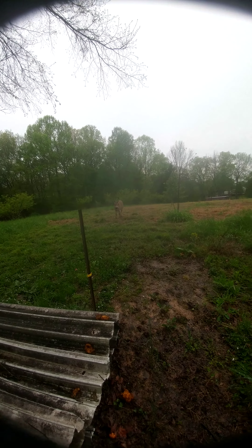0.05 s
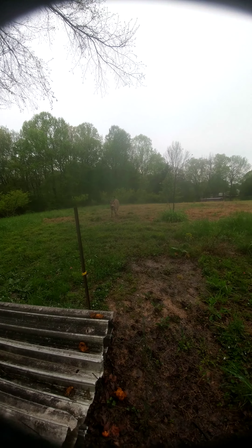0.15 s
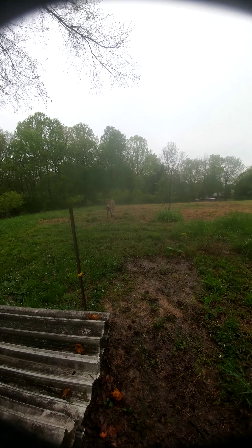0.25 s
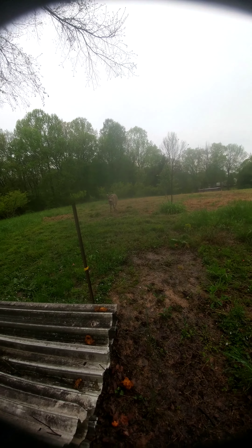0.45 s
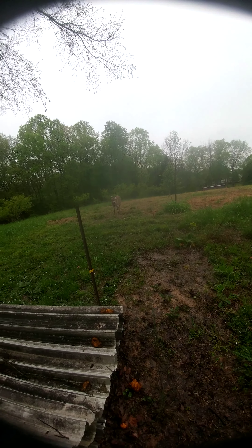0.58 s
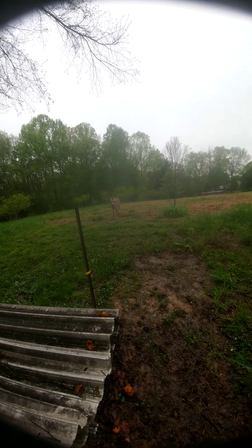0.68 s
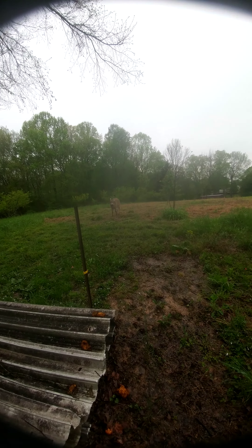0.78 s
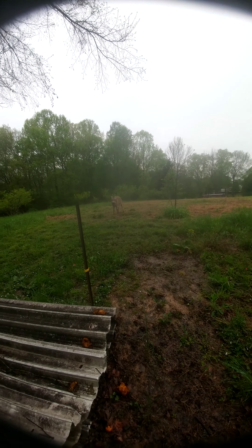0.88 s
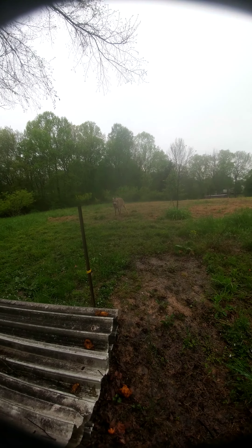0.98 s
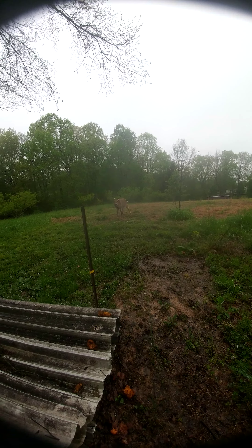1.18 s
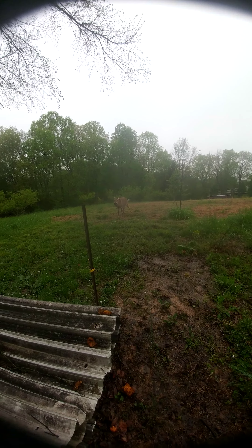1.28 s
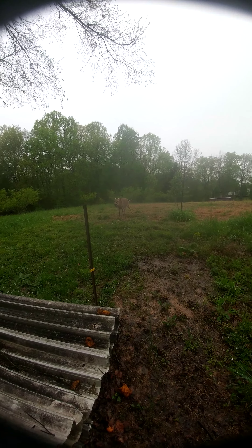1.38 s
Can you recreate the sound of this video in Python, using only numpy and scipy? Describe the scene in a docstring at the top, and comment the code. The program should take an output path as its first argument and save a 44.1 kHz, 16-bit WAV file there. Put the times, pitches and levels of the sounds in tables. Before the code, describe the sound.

A donkey brays hoarsely, two rattling grunts alternating with wheezy, whistling in-breaths in a quiet field.

```python
"""A dry click and the end of a wheezy in-breath come first, then a donkey brays hoarsely beside a field.
Two rattling grunts go out, each a train of throat pulses ringing the airway, with rushing air around them.
The wheezes between and after are noise drawn through wavering resonances; thin gliding tones break from them.
Clicks and scuffs, short noise bursts, sound close to the two microphones.
A faint scatter and quiet open air, both made of shaped noise, lie behind."""
import sys
import numpy as np
from scipy import signal
from scipy.fft import rfft, irfft
from scipy.io import wavfile

SR = 44100
rng = np.random.default_rng(int(sys.argv[2]) if len(sys.argv) > 2 else 0)


def to_wav(s):
    """Save 16-bit WAV."""
    ch = np.atleast_2d(s).T  # columns
    pcm = np.round(np.clip(ch, -1, 1) * 32767)  # PCM
    wavfile.write(sys.argv[1], SR, pcm.astype(np.int16))


N = 63945
T = np.arange(N) / SR


def amp(db):
    """Decibels to gain."""
    return 10 ** (np.asarray(db) / 20)


def unit(x):
    """Scales to rms 1."""
    return x / np.sqrt(np.mean(x ** 2) + 1e-20)


def read(points, hz, axis=1):
    """Reads a column of a table along log frequency."""
    p = np.array(points, float)
    return np.interp(np.log(hz + 1), np.log(p[:, 0] + 1), p[:, axis])


def level(points, axis=1):
    """Gain from a dB curve over time, silent outside it."""
    p = np.array(points, float)
    return amp(np.interp(T, p[:, 0], p[:, axis], left=-np.inf, right=-np.inf))


def colour(x, points, size=4096):
    """Causal (minimum-phase) filter of energy 1 with the given spectrum."""
    log_gain = np.log(amp(read(points, abs(np.fft.fftfreq(size, 1 / SR)))))
    ring = np.fft.ifft(np.exp(np.conj(signal.hilbert(log_gain)))).real[:size // 2]
    ring = ring / np.linalg.norm(ring)
    return signal.fftconvolve(np.atleast_2d(x), ring[None], axes=1)[:, :N]


def drift(rate_hz):
    """Random wandering of rms 1, smooth above the given rate."""
    softening = 1 + (np.fft.rfftfreq(N, 1 / SR) / rate_hz) ** 4
    return unit(irfft(rfft(rng.standard_normal(N)) / softening, N))


def resonate(x, hz, width_hz):
    """A resonance of gain 1 that follows a pitch curve: shift to zero frequency, smooth, shift back."""
    turn = np.exp(2j * np.pi * np.cumsum(hz * np.ones(N)) / SR)
    r = np.exp(-np.pi * width_hz / SR)
    return 2 * (turn * signal.lfilter([1 - r], [1, -r], x / turn)).real


def burst(start, rise_s, decay_s):
    """Quick rise, exponential fall."""
    t = np.maximum(T - start, 0)
    return np.minimum(t / rise_s, 1) * np.exp(-t / decay_s)


def throat_pulses(turns, strong_s):
    """Uneven throat pulses, every third the strongest, and the beat position counted from a strong one."""
    # Strength of each pulse in the cycle of three, in dB before shimmer.
    beat_db = [0, -2, -4.5]
    jitter_s, shimmer_db = .00022, 1.5  # rms unevenness of timing and strength
    turns = turns - np.interp(strong_s, T, turns)
    beats = np.arange(np.ceil(turns[0]) + 1, np.floor(turns[-1]) - 1).astype(int)
    chance = rng.standard_normal((len(beats), 2))
    at = np.interp(beats, turns, T) + jitter_s * chance[:, 0]
    strength_db = np.array(beat_db)[beats % len(beat_db)] + shimmer_db * chance[:, 1]
    pulses = np.zeros(N)
    pulses[np.clip(np.round(at * SR).astype(int), 0, N - 1)] = amp(strength_db)
    return pulses, turns


def smear(x, hz=597, width_hz=574):
    """The long airway delays a band, spreading each pulse: two equal all-pass stages."""
    r = np.exp(-np.pi * width_hz / SR)
    poles = [1, -2 * r * np.cos(2 * np.pi * hz / SR), r * r]
    poles = np.convolve(poles, poles)
    return signal.lfilter(poles[::-1], poles, x)


def grunt(effort, rate, strong_s, throat, voice_db, air_db, rough, puff, soft_db):
    """Slow throat pulses ring the airway and quivering mouth and chop the escaping air."""
    # Rushing out-breath. Each row: frequency in Hz, relative level in dB per Hz.
    air_out = [(200,-2),(1000,7),(1750,-5),(2500,3),(3450,-4),(4000,4.5),(4700,-4.5),(5900,-1.5),(6800,-10.5),(7900,-5),(9000,-20.5),(9700,-10),(11200,-12),(12600,-36)]
    pulses, turns = throat_pulses(np.cumsum(np.interp(T, *np.transpose(rate))) / SR, strong_s)
    gate = np.exp(-(turns % 1) / 0.35)  # air escapes most just after each beat
    hoarse = unit(pulses) + rough * unit((0.048 + gate) * rng.standard_normal(N))

    # Around and below soft_db of effort the voice turns dull and breathy.
    strength = level(effort)
    edge = strength ** 2 / (strength ** 2 + amp(soft_db) ** 2)
    slack = signal.lfilter(*signal.butter(1, 605, fs=SR), rng.standard_normal(N))  # low-pass, Hz
    drive = (edge * hoarse + (1 - edge) * slack) * strength

    voice = colour(smear(drive), throat) * [[1], [0]]  # no share unrelated between the microphones
    mouth_hz = 850 * (1 + .07 * drift(40))
    voice = voice + .5 * resonate(voice, mouth_hz, width_hz=130)
    voice = voice + resonate(voice, 395, width_hz=14)  # a low chest ring outlasts the pulses
    chopped = unit((1 + puff * gate) * rng.standard_normal((2, N)))
    air = colour(chopped * level(effort, axis=2), air_out)
    return amp(voice_db) * voice + amp(air_db) * air


def first_grunt():
    """The first rattling out-breath, its pulses quickening before they ease."""
    # Out-breath. Each row: time in seconds, voice in dB, rushing air in dB, both before the trims below.
    effort = [(.152,-54,-58),(.166,-44,-42),(.208,-13,-27),(.255,-14,-25),(.32,-12,-29),(.335,-18,-33),(.362,-21,-38),(.385,-28,-52),(.45,-38,-60)]
    # Pulse rate of the throat. Each row: time in seconds, rate in Hz.
    rate = [(0.203,104.1),(0.247,102.9),(0.272,115.2),(0.321,121.4),(0.439,116.4)]
    # Throat colour. Each row: frequency in Hz, relative level in dB per Hz.
    throat = [(50,-49),(140,-15.5),(220,-5.5),(330,2),(430,2),(560,-13.5),(720,-1),(840,3.5),(980,-6),(1170,-0.5),(1420,-12.5),(1650,-28),(14000,-76)]
    return grunt(effort, rate, strong_s=.2068, throat=throat,
                 voice_db=1.0, air_db=2, rough=.22, puff=1.4, soft_db=-18)


def second_grunt():
    """The second out-breath, rougher and airier, its pulses slowing and then recovering."""
    # Out-breath. Each row: time in seconds, voice in dB, rushing air in dB, both before the trims below.
    effort = [(.726,-53,-54),(.746,-41,-35),(.779,-17.5,-28.5),(.8,-21,-28.5),(.819,-16.5,-26.5),(.83,-27,-33),(.851,-21,-30),(.865,-30,-36),(.9,-29.5,-39),(.915,-35,-48),(.96,-41,-55)]
    # Pulse rate of the throat. Each row: time in seconds, rate in Hz.
    rate = [(0.758,105.4),(0.798,103.3),(0.832,90.2),(0.902,106.6)]
    # Throat colour. Each row: frequency in Hz, relative level in dB per Hz.
    throat = [(50,-23),(170,-1.5),(280,1),(430,-3),(540,-15),(720,-3),(920,-2),(1110,-8),(1400,-12.5),(1700,-24),(14000,-61)]
    return grunt(effort, rate, strong_s=.778, throat=throat,
                 voice_db=-1.0, air_db=6.0, rough=.3, puff=1.0, soft_db=-27.5)


def wheezes(flutter_db=2.2, flutter_hz=90, pipe_width_hz=150, pipe_waver=.004):
    """Air drawn in through a narrow, fluttering airway whose resonances waver."""
    # In-breaths, one list each. Each row: time in seconds, level in dB before flutter and resonances.
    breaths = [
        [(0,-36.5),(.1,-43),(.15,-56.5)],
        [(.45,-38.5),(.468,-32),(.495,-25),(.535,-31.5),(.675,-33),(.72,-56)],
        [(.94,-47.5),(.985,-35.5),(1.015,-28),(1.09,-33.5),(1.19,-45.5),(1.34,-61.5)],
    ]
    # Rushing in-breath. Each row: frequency in Hz, relative level in dB per Hz.
    air_in = [(120,-20.5),(800,-0.5),(1400,-8),(3400,-6),(4100,0.5),(4750,2),(5120,-15),(5600,-3),(6500,-19),(8200,-15.5),(9000,-51),(9800,-14.5),(12700,-35.5)]
    # Narrow resonances of the airway. Each row: centre in Hz before waver, gain in dB.
    pipes = [(1070,8),(2390,7),(3620,3),(4010,11),(4670,15)]
    flutter = amp(flutter_db * drift(flutter_hz))
    air = sum(level(breath) for breath in breaths) * flutter * rng.standard_normal((2, N))
    out = colour(air, air_in)
    for centre_hz, db in pipes:
        hz = centre_hz * (1 + pipe_waver * drift(6))
        once = resonate(air, hz, pipe_width_hz)
        out = out + amp(db) * resonate(once, hz, pipe_width_hz)
    return out


def whistles(waver=.022, waver_hz=300, flicker_db=3):
    """Hoots and whistles in the narrowed airway: short unsteady sines that swell and glide."""
    # Each row: start in seconds, length in seconds, start in Hz, end in Hz, peak level in dB before flicker.
    tones = [(.325,.05,860,760,-25),(.475,.05,1020,1120,-33),(.47,.05,3950,4300,-30),(.475,.055,4850,4600,-28),(.957,.028,2930,3250,-34),(.985,.04,3650,4600,-30),(1.01,.04,1650,2020,-33),(1.02,.035,1130,860,-30),(1.06,.075,790,700,-39),(1.02,.055,4700,4350,-29),(1.075,.07,4650,4430,-36)]
    out = np.zeros((2, N))
    for start, length, from_hz, to_hz, db in tones:
        u = np.clip((T - start) / length, 0, 1)
        hz = (from_hz + (to_hz - from_hz) * u) * (1 + waver * drift(waver_hz))
        tone = np.sqrt(2) * np.sin(2 * np.pi * np.cumsum(hz) / SR)
        out[0] += amp(db + flicker_db * drift(waver_hz)) * np.sin(np.pi * u) * tone
    return out


def ports(pair):
    """Places a sound (first row) at the two microphones; the second row is its unrelated share."""
    # The animal at the microphones. Each row: frequency in Hz, left-right in dB, radians the left leads.
    bearing = [(190,0.5,0),(460,-0.5,0.5),(620,4.5,-1.25),(930,0,0.45),(2700,-1.5,1.03),(4100,-5,1.4),(5000,-10,2),(5960,-5,3.5),(7900,-5,3.5),(8430,3,7.5),(9860,12,4),(13200,-2.5,3.5)]
    hz = np.fft.rfftfreq(N, 1 / SR)
    shared, unrelated = rfft(pair)
    same = 1 / (1 + (hz / 10700) ** 2)  # the microphones hear less alike towards the treble
    tilt = amp(read(bearing, hz) / 2)
    turn = np.exp(1j * read(bearing, hz, axis=2))
    shared = shared * np.sqrt((1 + same) / 2)
    unrelated = unrelated * np.sqrt((1 - same) / 2)
    left = (shared + unrelated) * tilt * turn
    right = (shared - unrelated) / tilt
    return irfft(np.array([left, right]) / np.sqrt((tilt ** 2 + tilt ** -2) / 2), N)


def clicks(decay_s=0.00054):
    """Tiny dry snaps near the microphones: noise that dies within a few milliseconds."""
    # Each row: start in seconds, level in dB, left-right in dB.
    snaps = [(0.0137,-19,1),(1.0168,-7,-8),(1.141,-27,2)]
    # Click colour. Each row: frequency in Hz, relative level in dB per Hz.
    snap_colour = [(100,-14),(700,-3),(4500,3),(7500,-6),(11000,-10),(13000,-36)]
    out = np.zeros((2, N))
    for start, db, pan in snaps:
        noise = amp(db) * burst(start, .0001, decay_s) * rng.standard_normal((2, N))
        out += colour(noise, snap_colour) * amp([[pan / 2], [-pan / 2]])
    return out


def scuffs(rise_s=0.0029, grain_db=4, lag_s=0.00024, width_hz=400):
    """Soft thuds, each with its own hollow pitch, and a gritty crackle, a little to the right."""
    # Each row: start in seconds, thud pitch in Hz, thud level in dB, grit level in dB, decay in seconds.
    knocks = [(1.074,530,-28,-40,0.01),(1.15,590,-26.5,-41,0.0063),(1.356,714,-36,-33.5,0.017),(1.385,547,-36,-43,0.021),(1.414,570,-27.5,-33.5,0.017),(1.4425,237,-24,-46,0.0072)]
    # Grit colour. Each row: frequency in Hz, relative level in dB per Hz.
    grit_colour = [(500,-31),(2500,5),(7700,6.5),(9000,-0.5),(10700,1.5),(12500,-13)]
    thud, grit = np.zeros(N), np.zeros(N)
    for start, hz, thud_db, grit_db, decay_s in knocks:
        shape = burst(start, rise_s, decay_s)
        hollow = resonate(resonate(rng.standard_normal(N), hz, width_hz), hz, width_hz)
        thud += amp(thud_db) * shape * unit(hollow)
        grit += amp(grit_db) * shape
    grit = grit * unit(amp(grain_db * drift(710)))  # the crackle's grain
    crackle = colour(grit * rng.standard_normal((2, N)), grit_colour) * amp([[-2], [2]])
    late_left = np.interp(T - lag_s, T, thud)
    return np.array([late_left, thud]) + crackle


def surroundings(x, t60_s=.25, tail_db=-16):
    """A faint short scatter from the ground and nearby things: decaying noise convolved with the sound."""
    t = T[:SR // 2]
    tail = rng.standard_normal((2, len(t))) * amp(-60 * t / t60_s) * (t > .004)  # gap in seconds
    tail = tail[0] + .5 * tail[1] * np.array([[1], [-1]])
    return amp(tail_db) * signal.fftconvolve(x, tail / np.linalg.norm(tail[0]), axes=1)[:, :N]


def field(apart=0.22, shared_db=-49.5):
    """Quiet rumble and hiss of the open air: noise mostly shared by the microphones."""
    # Open air. Each row: frequency in Hz, relative level in dB per Hz.
    open_air = [(25,-18),(70,10),(130,-1),(350,-9.5),(800,-3.5),(1500,-10.5),(11000,-24.5),(14000,-33)]
    noise = rng.standard_normal(N) + apart * rng.standard_normal((2, N))
    return amp(shared_db) * colour(noise, open_air)


def scene():
    """The donkey, small noises close by, their scatter and the field."""
    donkey = first_grunt() + second_grunt() + wheezes() + whistles()
    near = ports(donkey) + clicks() + scuffs()
    return near + surroundings(near) + field()


def record(dry, low_cut_hz=50, edge_hz=15800):
    """The microphones' bass cut and the upper band limit."""
    dry = signal.sosfilt(signal.butter(2, low_cut_hz, "high", fs=SR, output="sos"), dry)
    band_limit = signal.firwin(511, edge_hz, window=("kaiser", 9), fs=SR)
    return signal.oaconvolve(dry, band_limit[None], "same")


dry = scene()
out = record(dry)
to_wav(out)
```